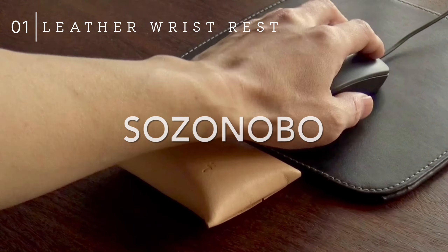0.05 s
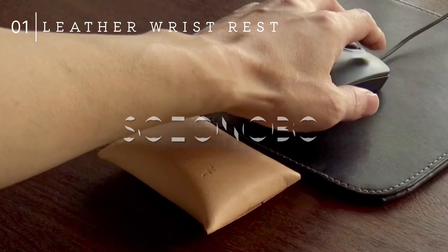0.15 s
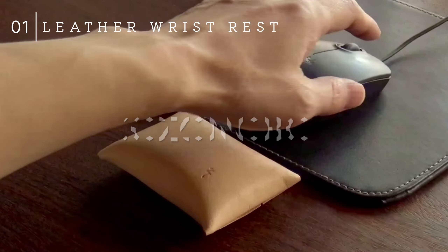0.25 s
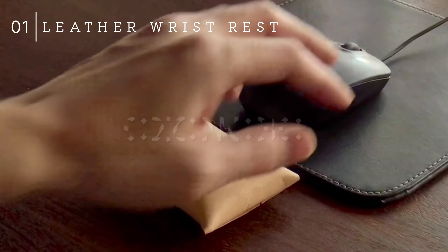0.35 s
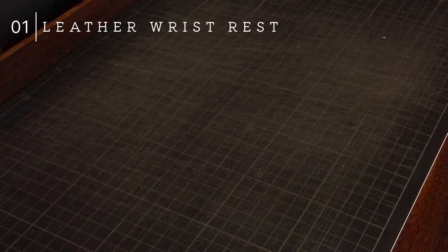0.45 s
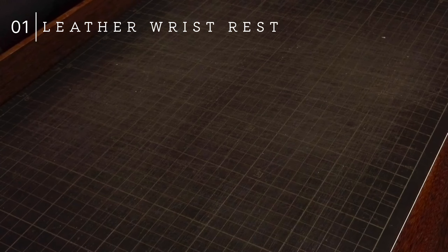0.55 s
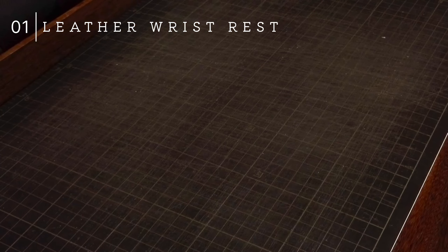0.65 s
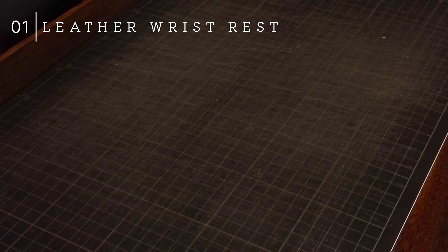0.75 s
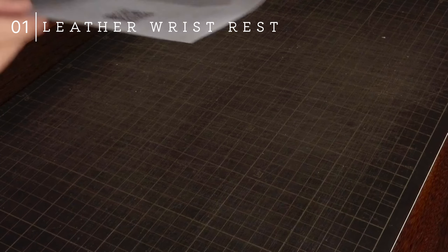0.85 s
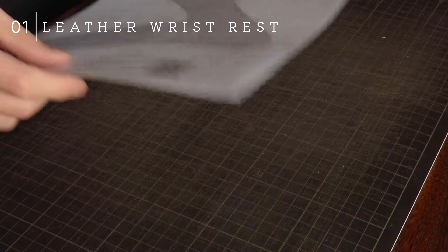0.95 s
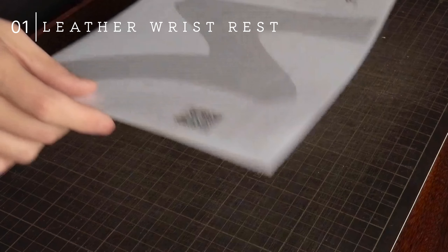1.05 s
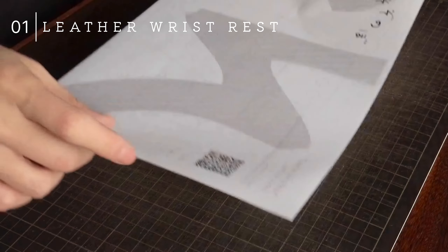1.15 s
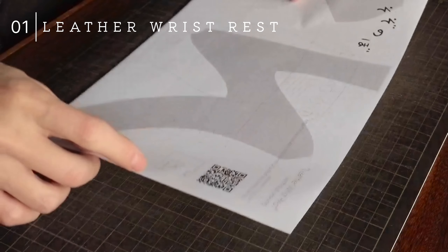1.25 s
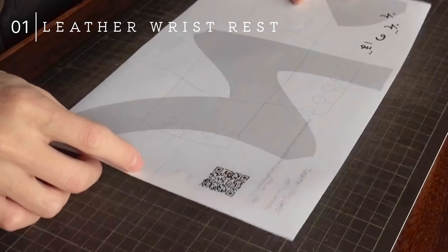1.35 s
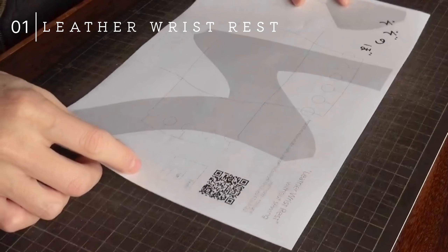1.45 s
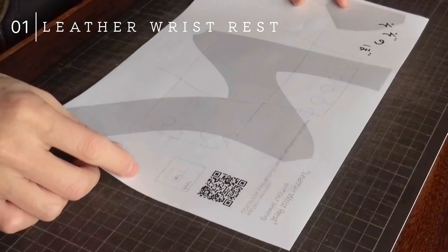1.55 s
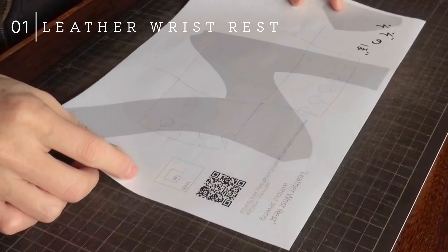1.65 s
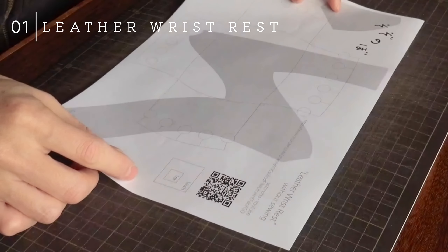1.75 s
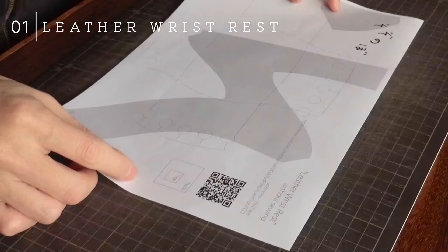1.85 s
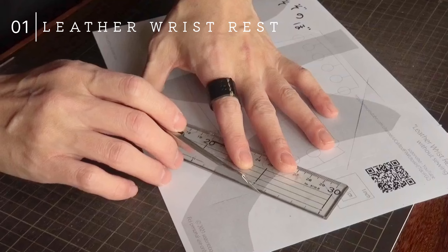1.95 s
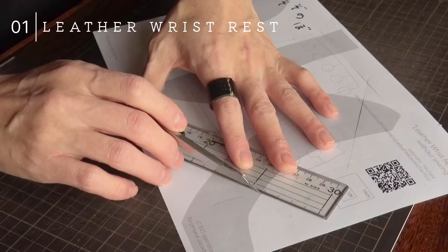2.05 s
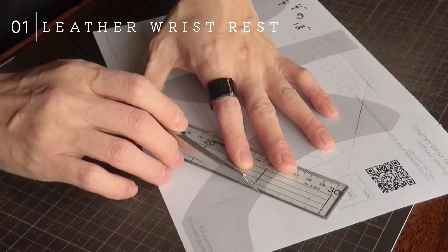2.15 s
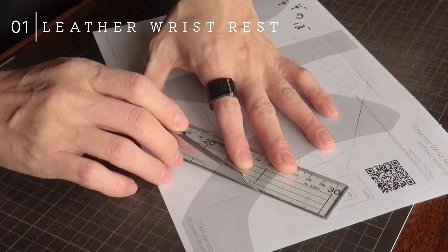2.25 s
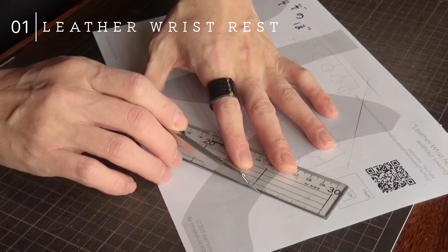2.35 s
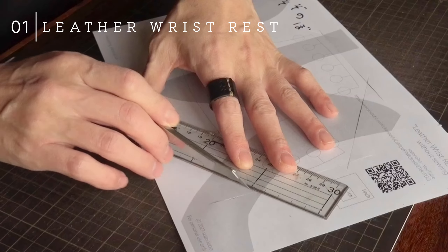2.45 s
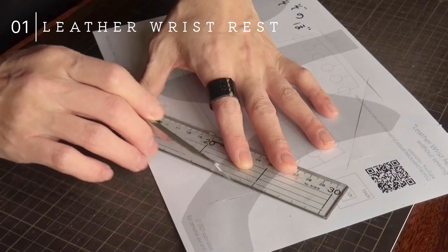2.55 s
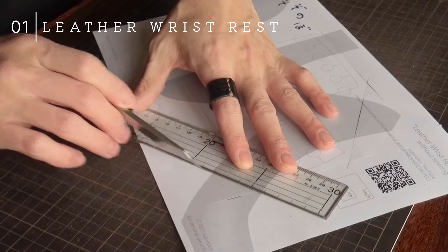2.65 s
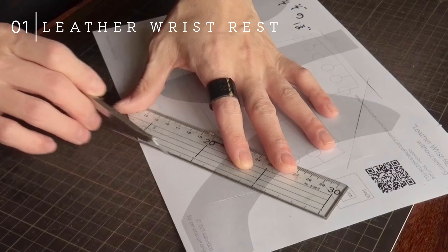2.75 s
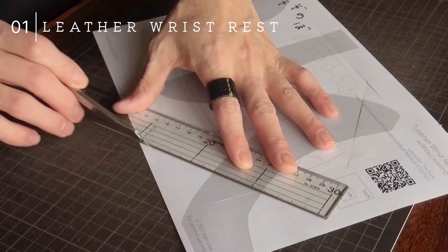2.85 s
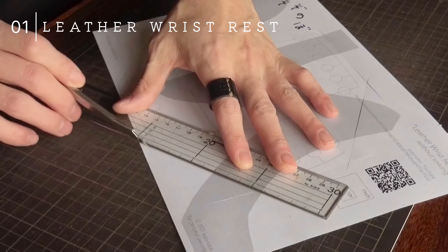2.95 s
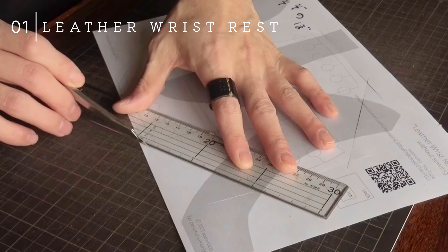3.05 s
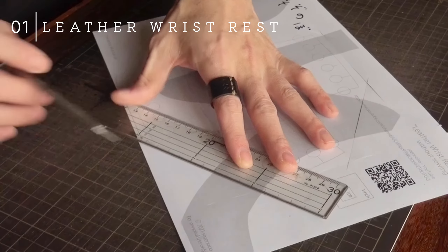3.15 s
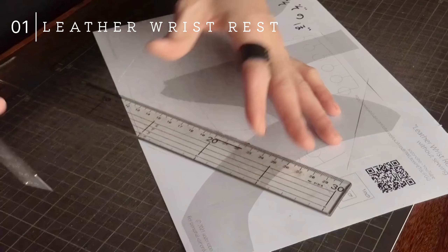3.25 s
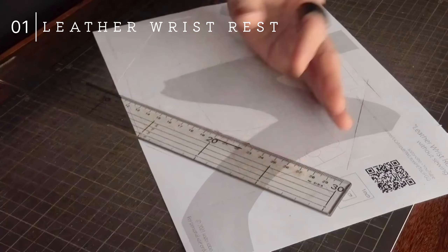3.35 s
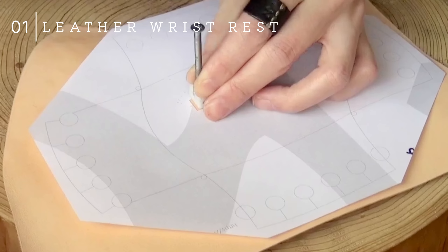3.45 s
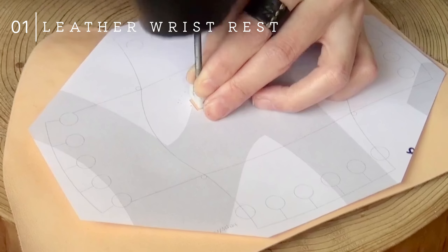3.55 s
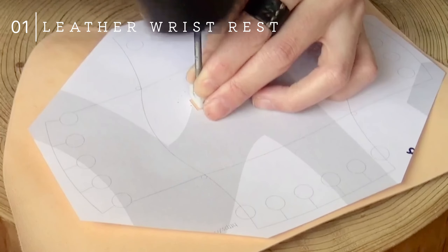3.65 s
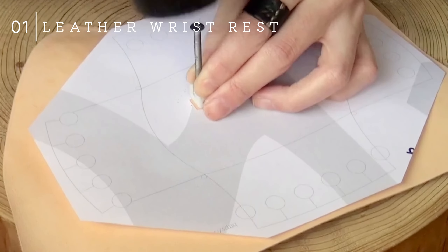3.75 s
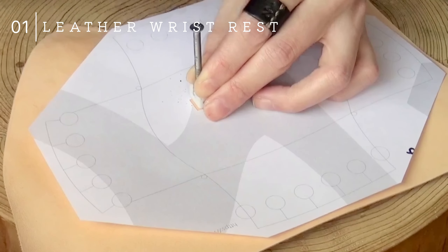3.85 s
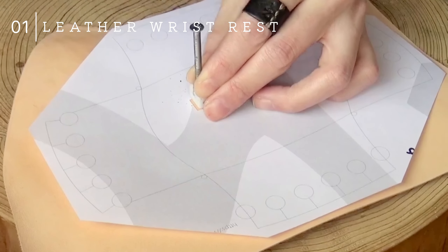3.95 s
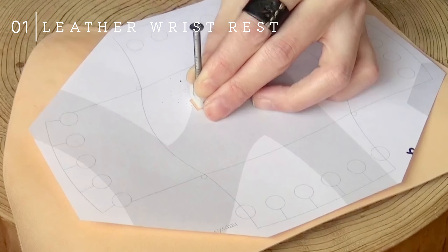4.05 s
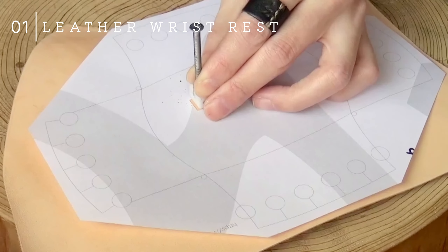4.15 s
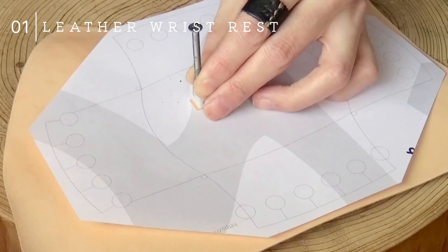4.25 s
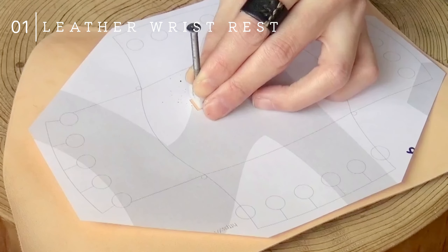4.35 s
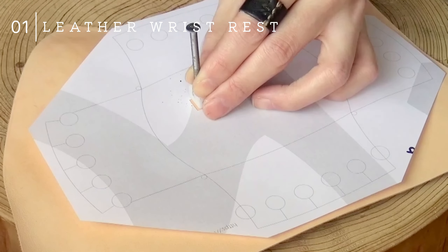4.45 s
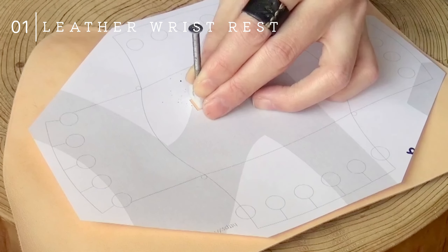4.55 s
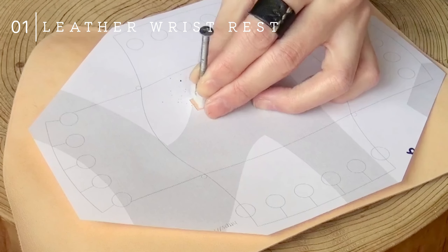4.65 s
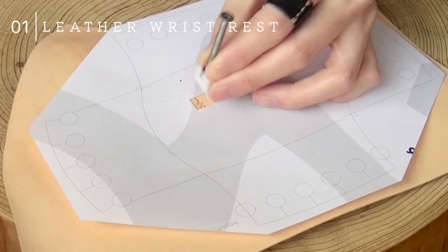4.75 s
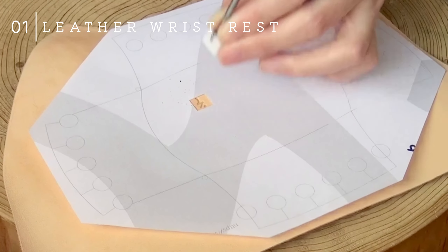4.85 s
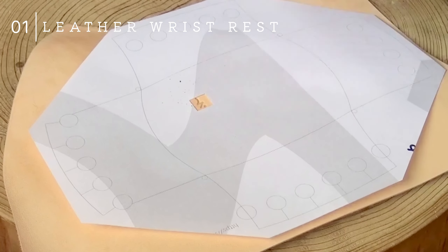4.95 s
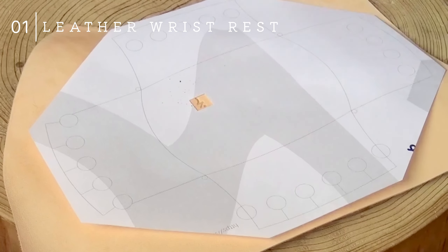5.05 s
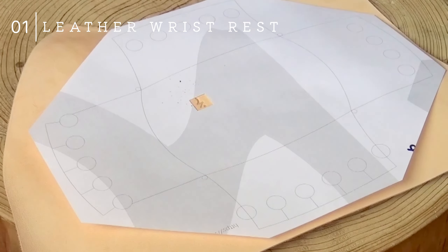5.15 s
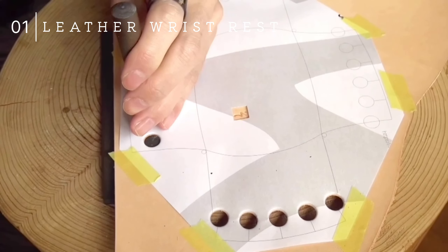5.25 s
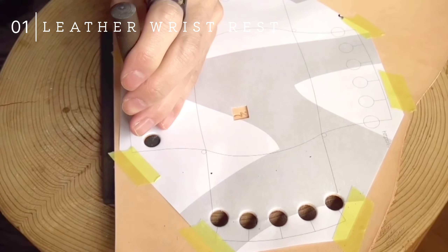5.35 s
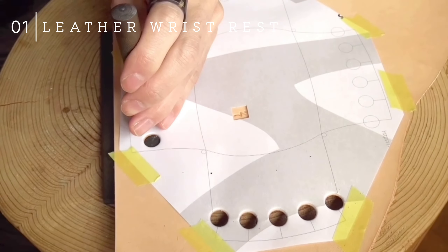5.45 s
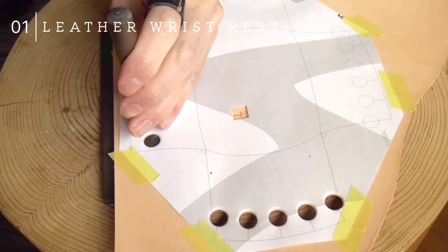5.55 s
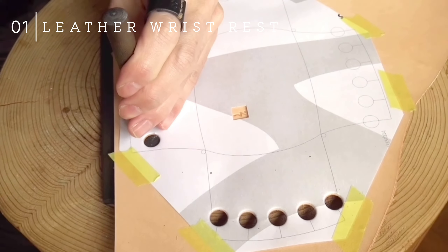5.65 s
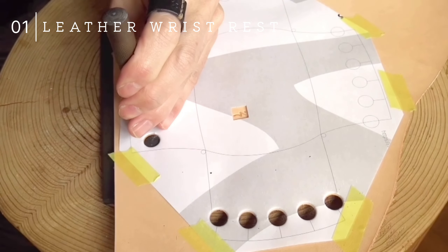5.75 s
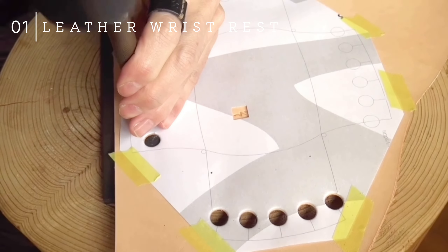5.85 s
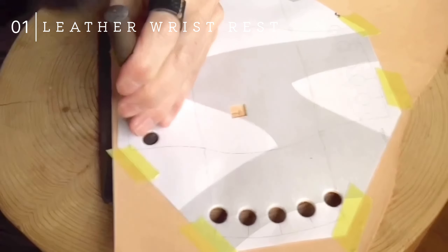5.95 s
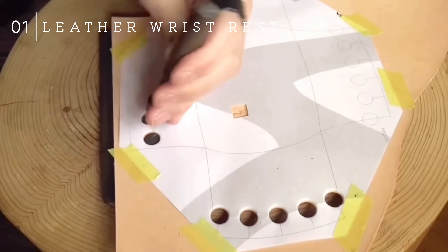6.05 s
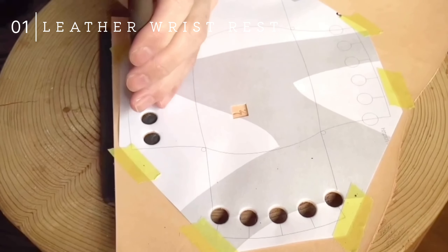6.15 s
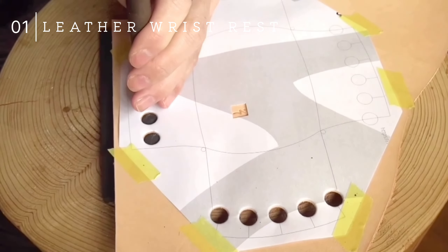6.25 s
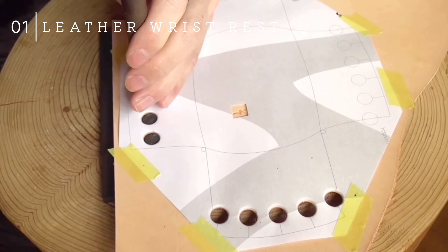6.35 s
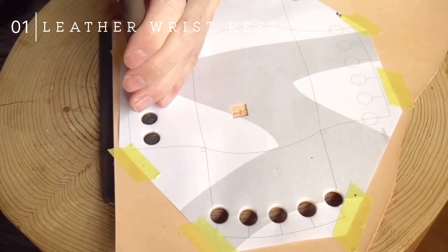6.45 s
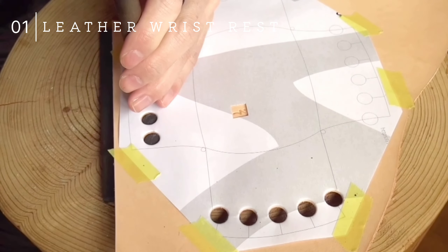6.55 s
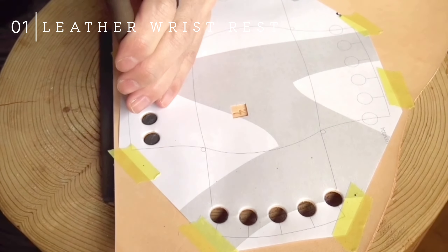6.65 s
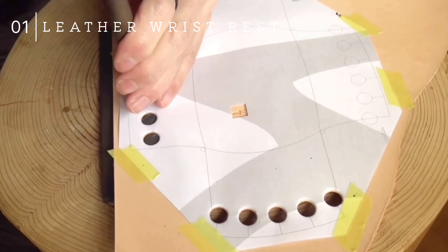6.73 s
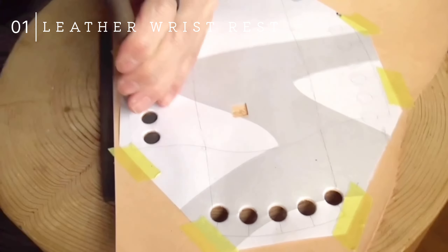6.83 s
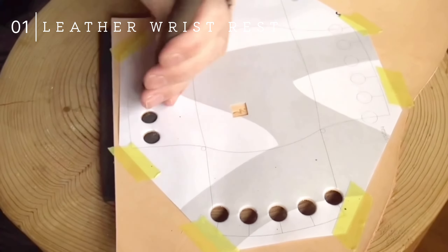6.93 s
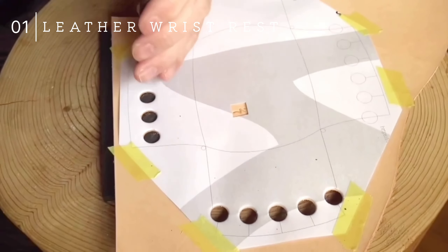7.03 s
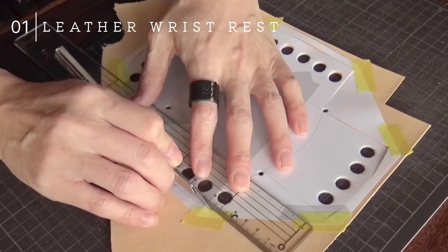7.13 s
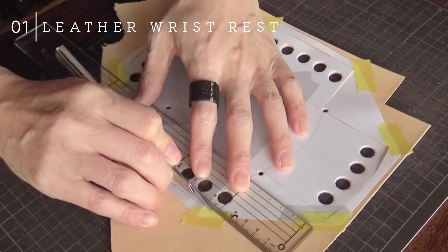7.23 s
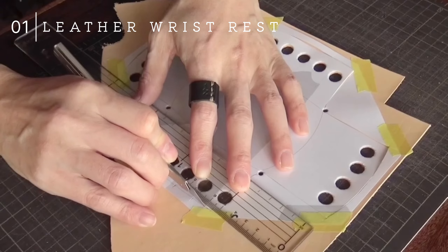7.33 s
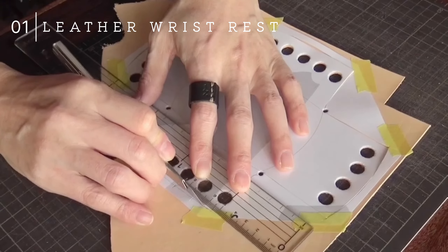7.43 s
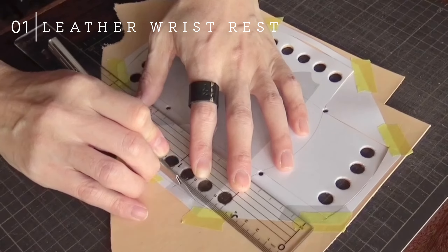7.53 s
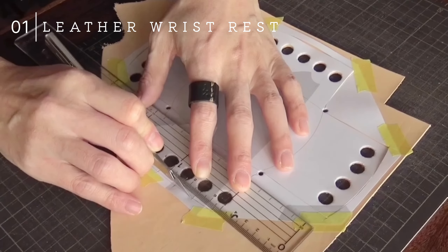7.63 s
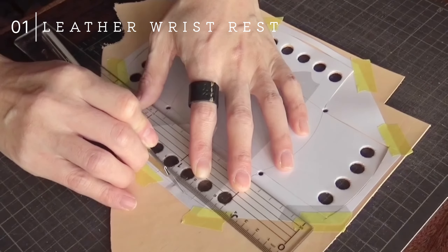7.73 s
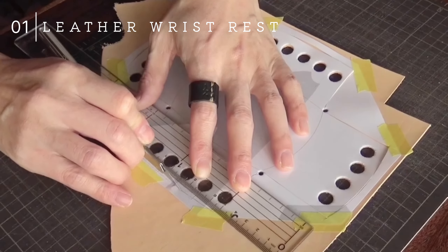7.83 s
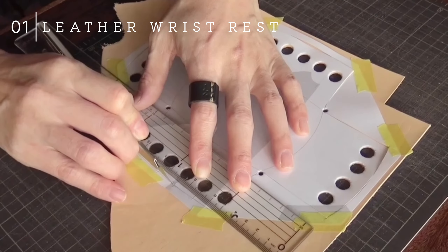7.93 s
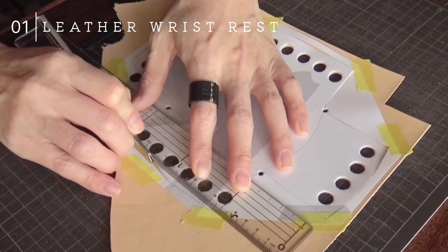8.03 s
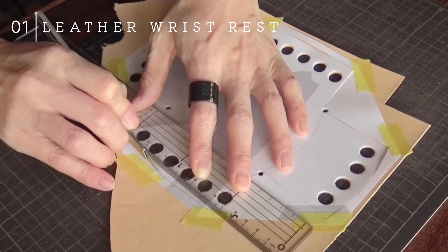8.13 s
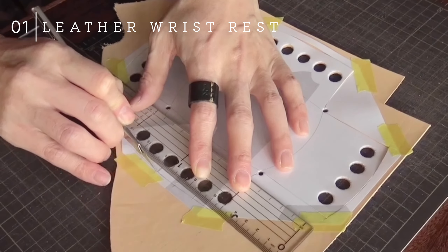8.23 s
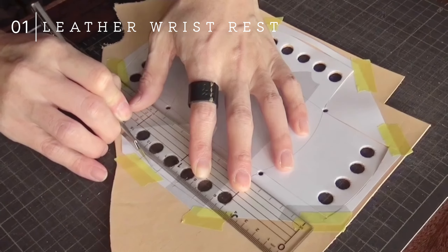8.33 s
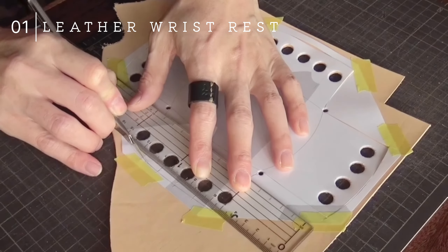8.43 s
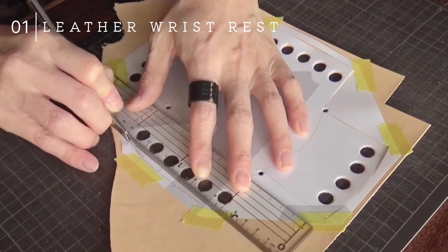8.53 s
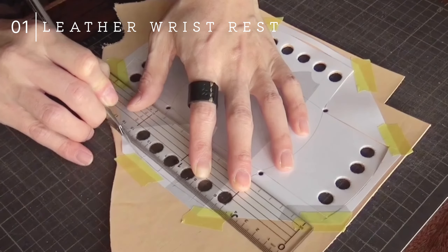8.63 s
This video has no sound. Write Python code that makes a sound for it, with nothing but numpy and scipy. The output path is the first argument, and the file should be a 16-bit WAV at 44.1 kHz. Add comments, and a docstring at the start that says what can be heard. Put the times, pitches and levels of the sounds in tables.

```python
"""Leather work on a bench

A paper pattern slides and flaps down. A knife rubs and whistles along a ruler. A thin, then a wide
hollow punch is hammered into a wooden block: steel cracks, block and bench ring, the wide edge crunches
through. The knife saws in short strokes that catch and let go. Each passage fades in and out with
quiet room tone."""
import sys
import numpy as np
from scipy import signal
from scipy.fft import rfft, irfft, next_fast_len
from scipy.io import wavfile

SR = 44100
rng = np.random.default_rng(int(sys.argv[2]) if len(sys.argv) > 2 else 0)


def store_wav(level_fs):
    """Save 16-bit WAV to argv[1]."""
    pcm = np.round(np.clip(np.atleast_2d(level_fs), -1, 1) * 32767)
    wavfile.write(sys.argv[1], SR, pcm.T.astype(np.int16))


N = 382995
FFT_SIZE = next_fast_len(N)
TIME_S = np.arange(N) / SR
FREQ_HZ = np.maximum(np.fft.rfftfreq(FFT_SIZE, 1 / SR), 1)

# Hammer contacts. Each row: start in seconds, body level in dB, crack level in dB.
THIN_HITS = [(3.489, -40.5, -14), (3.4915, -3, -7.5), (3.639, -40.5, -19), (3.6425, -3.5, -5.5)]
WIDE_HITS = [(5.8035, -7.5, -9), (5.9045, -26.5, -15), (5.9062, -3, -19), (5.9187, -8, -9.5),
             (6.7145, -5.5, -10.5), (6.8025, -21, -14), (6.8045, -3, -13), (6.818, -13, -19.5)]
# Block, bench and tube modes. Each row: frequency in Hz, relative level in dB, T60 in seconds.
THIN_BODY_MODES = [(63, -5, .3), (112.7, -13.5, 0.2), (170, -14.5, 0.17), (231.2, 4.5, 0.12),
                   (253, -2, 0.23), (328.4, -0.5, 0.17), (342, -17.5, 0.91), (384.4, -5, .2),
                   (411, -10.5, 0.23), (552.6, -1, 0.093), (598, -1, 0.11), (682, -9, 0.16), (738, -9, 0.2),
                   (788, -17, 0.12), (1635, -16, .1), (1800, -17.5, .1), (2422, -12, .09),
                   (2563, -10.5, .09), (5560, -19.5, .06)]
WIDE_BODY_MODES = [(194, -11.5, 0.093), (319.4, -16.5, 0.083), (430, -14, 0.068), (650.4, -1.5, 0.035),
                   (794, -9, 0.034), (974, 2, 0.032), (1008, 7, 0.045), (1114, -8.5, 0.05)]
TUBE_MODES = [(600, -8, 0.43), (1208, -1.5, 0.43), (1237, -1.5, 0.35), (1570, -3, .2), (1890, -13, 0.23),
              (6600, -6.5, 0.15)]
# Dense ring of the block. Each row: frequency in Hz, relative level in dB.
THIN_RING_DB = [(50, -28), (200, -11.5), (600, -14), (950, -28.5), (1300, -12.5), (2300, -9), (3300, -18.5),
                (4000, -49), (5500, -12), (7000, -34.5), (10000, -34.5), (16000, -53.5)]
WIDE_RING_DB = [(50, -48.5), (200, -26), (800, -20), (1100, -21), (1700, -23), (2500, -33), (4000, -25.5),
                (5300, -23), (7000, -33.5), (11000, -38.5), (16000, -64.5)]
# Its decay. Each row: frequency in Hz, T60 in seconds.
THIN_RING_T60_S = [(60, 0.087), (200, 0.54), (500, 0.31), (2000, 0.2), (10000, 0.13)]
WIDE_RING_T60_S = [(150, 0.08), (600, .08), (1500, 0.064), (3000, 0.054), (12000, .045)]
# Wide punch biting. Each row: start in seconds, crunch in dB, length in seconds, ring in dB, thud in dB.
WIDE_BITES = [(5.9022, -24.5, 0.018, -30, -21), (6.8006, -24.5, 0.017, -29, -22.5)]
# Two paper slides. Each row: time in seconds, body level in dB, crisp level in dB.
PAPER_SLIDES = [
    [(.42, -60, -65), (.49, -57, -62), (.54, -68, -76), (.61, -58.5, -67), (.67, -68, -71), (.70, -56, -52),
     (.83, -55.5, -58.5), (.87, -56, -43.5), (.97, -51.5, -53.5), (1.14, -53.5, -52), (1.225, -57, -62),
     (1.33, -55, -51), (1.79, -66, -64), (1.9, -60, -51.5)],
    [(3.1, -59.5, -61.5), (3.29, -70.5, -74), (3.35, -67, -63), (3.42, -67, -60.5)],
]
# Paper flaps and taps, then the thin punch rattling (rows from 3.57 s). Each row: start in seconds, # peak in
# dB, centre in Hz, width in octaves, T60 in seconds, treble in dB re peak.
FLAPS_AND_RATTLES = [(0.432, -57, 1700, 2.5, .12, -8), (.49, -44, 1880, 1.4, 0.16, -6),
                     (.684, -27.5, 1330, 1.2, 0.17, -7.5), (.74, -33, 1070, 1.35, 0.15, -22),
                     (.851, -33, 990, 1.73, 0.22, -20), (.895, -45, 1880, .8, .12, -10),
                     (1.238, -35, 383, 1.7, 0.27, -24), (1.268, -35, 1970, 1.5, 0.082, -18),
                     (3.573, -44, 1450, 0.34, 0.22, -43.5), (3.61, -39.5, 1400, 0.48, 0.19, -41.5),
                     (3.745, -47, 1380, 0.29, .2, -40), (5.05, -37, 1920, 1.7, 0.062, -5.5)]
# Bright ticks. Each row: start in seconds, peak in dB.
BRIGHT_TICKS = [(0.7415, -31), (2.394, -35), (3.113, -51), (3.1602, -46), (3.3124, -49), (4.6982, -53),
                (5.9763, -43), (6.865, -33.5)]
# Metallic rings. Each row: start in seconds, level in dB, frequency in Hz, T60 in seconds.
METAL_PINGS = [(0.424, -50.5, 4200, 0.21), (.555, -57, 4180, 0.15), (.686, -48, 3000, 0.12),
               (3.574, -40.5, 1493, 0.24), (3.58, -41.5, 1330, 0.23), (3.74, -55, 1485, .25)]
# Rub under blade pressure; faint hiss. Each row: time in seconds, level in dB.
CUT_LEVEL_DB = [(2.29, -76), (2.4, -52.5), (2.65, -39), (2.78, -41.5), (2.87, -51.5), (2.94, -70)]
HISS_LEVEL_DB = [(5.2, -63), (5.45, -62), (5.65, -69), (6.05, -81), (6.3, -64.5), (6.6, -62), (7.03, -78.5)]
# Sawing. Each row: start in seconds, level in dB, rise in seconds, length in seconds.
SAW_STROKES = [(7.247, -56, 0.011, 0.034), (7.306, -58.5, .009, 0.029), (7.383, -56, .013, 0.025),
               (7.446, -51, 0.045, 0.077), (7.556, -50, 0.0054, 0.045), (7.658, -54, 0.0027, 0.023),
               (7.692, -53.5, .0075, 0.042), (7.769, -51, .0037, 0.035), (7.835, -45, 0.056, 0.044),
               (7.921, -53, 0.024, 0.064), (8.028, -50.5, 0.0045, 0.029), (8.092, -53.5, 0.0028, 0.033),
               (8.158, -50.5, .031, 0.047), (8.255, -53, 0.0071, .037), (8.34, -55, 0.024, 0.042),
               (8.394, -56, .02, .05), (8.499, -53, 0.0073, .038), (8.574, -55, 0.016, 0.095)]
# Punch squeak. Each row: time in seconds, pitch in Hz, level in dB.
SQUEAK_PATH = [(3.96, 8400, -92), (4.0, 8600, -83), (4.035, 9750, -72), (4.09, 9350, -76),
               (4.135, 11000, -80), (4.165, 10300, -73), (4.195, 9000, -90)]
# Hums. Each row: start and length in seconds, level in dB, pitch in Hz, rise and T60 in seconds,
# waver in Hz.
HUM_SPANS = [(0.496, 1.25, -51, 59, .25, .5, 5.1), (5.2, 2.03, -66.5, 560.6, .01, .01, 2.48)]
# Rumbles. Each row: start and length in seconds, level in dB, centre in Hz, rise and T60 in seconds.
RUMBLE_SPANS = [(3.807, 0.21, -51.5, 60, .01, .3), (7.087, 0.24, -57.5, 127, 0.028, 0.74)]
# Rumble spectrum. Each row: multiple of the centre, relative density in dB.
RUMBLE_SHAPE = [(.3, -33), (.75, -8), (1.0, 9), (1.3, -8), (2.2, -30), (5, -53)]
# Noise spectra, room tones one list each. Each row: frequency in Hz, relative density in dB.
CRUNCH_SPECTRUM = [(880, -48.5), (1500, -6.5), (2800, -3.5), (3000, -20), (3810, -6), (5880, -12.5),
                   (14300, -11.5), (16000, -34)]
PAPER_SPECTRUM = [(300, -47), (600, -2), (1200, -11), (1700, 0.5), (3000, -3.5), (4500, -2.5), (6500, -11),
                  (10000, -32)]
CRISP_SPECTRUM = [(2500, -43), (4500, -3.5), (6000, -1), (8300, 2), (11000, -4), (16000, -7)]
MAT_SPECTRUM = [(59, -41), (100, -10), (252, -4), (377, -14.5), (407, -7.5), (563, -7.5), (829, -7.5),
                (1610, -10.5), (4000, -22.5), (5200, -38), (8800, -120)]
BLADE_SPECTRUM = [(1180, -27), (2000, -13), (4450, -5), (7980, -2.5), (13000, -1), (14000, -4),
                  (14500, -62), (16000, -73)]
LEATHER_SPECTRUM = [(47, -40), (80, -7), (224, -7), (359, -8.5), (743, -5), (1590, -19), (1750, -10.5),
                    (2080, -24), (3500, -19.5), (4550, -38), (7700, -120)]
EDGE_SPECTRUM = [(1470, -28), (2500, -4), (3460, -11), (3740, -10), (4730, 2.5), (5650, -6.5),
                 (12300, -9.5), (16000, -10.5)]
HISS_SPECTRUM = [(2500, -36), (3700, -7.5), (5200, -13), (6000, 5), (7200, -2), (8000, -9.5), (9300, -14),
                 (11000, -30.5)]
ROOM_SPECTRA = [
    [(12, -71), (20, -16.5), (60, -3), (242, -13.5), (278, -17), (551, -22.5), (832, -27), (1560, -19),
     (2860, -32), (8090, -37), (14000, -37)],
    [(12, -35), (20, -5.5), (65, 1.5), (184, -7), (211, -6), (536, -13.5), (706, -13), (879, -17),
     (1520, -10.5), (3190, -31), (14000, -34)],
    [(12, -30), (20, -13.5), (81, -4), (168, -10.5), (204, -15), (446, -19), (574, -26.5), (738, -22.5),
     (1150, -24.5), (1860, -18.5), (2910, -24.5), (3250, -34.5), (16000, -39)],
    [(12, -86.5), (20, -47), (134, -9), (172, -11.5), (204, -1.5), (513, -14), (558, -4.5), (780, -15),
     (1570, -19.5), (2750, -26), (6010, -25), (14300, -38), (16000, -44)],
    [(12, -51), (20, -27), (241, -2), (367, -16), (422, -5), (574, -16.5), (718, -13.5), (1530, -22.5),
     (1710, -20), (3070, -24), (4940, -18), (5850, -28.5), (16000, -37.5)],
]
# Peaks and dips on those spectra. Each row: centre in Hz, width in Hz, lift in dB.
MAT_PEAKS = [(412, 74, 2.5), (622, 66, 10), (840, 59, 7), (945, 46, 9), (1170, 38, 6)]
LEATHER_PEAKS = [(267, 72, 9), (514, 80, 4), (728, 69, 6.7), (997, 84, 9), (1315, 45, 13), (1770, 84, 6.8)]
EDGE_PEAKS = [(3830, 130, 12), (4700, 360, 2), (6840, 300, 1), (8350, 200, 6), (10400, 300, -1),
              (13500, 500, 4)]
HISS_PEAKS = [(3770, 250, 7.5), (4830, 200, 5), (5950, 200, 4.5), (6610, 250, -2.5), (7000, 200, 4)]
ROOM_PEAKS = [
    [(61.5, 9.3, 1)],
    [(1390, 470, -9)],
    [(700, 94, 4), (1530, 56, 1), (1854, 37, 9.5), (1898, 33, 10), (1980, 60, 6.5), (2300, 140, -1.5),
     (2863, 110, 9.5)],
    [(557, 32, 4), (652, 19, 7.5), (1524, 28, 11), (3700, 350, -6), (4860, 200, 4.5), (6020, 250, 8),
     (7000, 760, 2.5), (8860, 700, 10)],
    [(4510, 600, -1), (6720, 890, 9.5)],
]
# Stereo positions. Each row: frequency in Hz, left over right in dB.
THIN_PAN_DB = [(60, 1.5), (130, 5.5), (290, 2), (640, 4.0), (1410, -0.5), (3100, 1.0), (6820, 2),
               (15000, 0)]
WIDE_PAN_DB = [(60, 0.5), (130, 1), (290, 2), (640, 2), (1410, -1.5), (3100, -1.5), (6820, 0.5),
               (15000, -1)]
PAPER_PAN_DB = [(60, 2.0), (180, 2.5), (550, -1), (1650, -2), (4970, -0.5), (15000, 0.0)]
CUT_PAN_DB = [(60, 4), (180, 5), (550, -0.5), (1650, -2), (4970, -0.5), (15000, 0.5)]
SAW_PAN_DB = [(60, 0), (180, 0), (550, 4), (1650, -1.5), (4970, -1.5), (15000, 0.5)]
# Background stereo width. Each row: frequency in Hz, left-right coherence.
ROOM_COHERENCE = [(60, 0.96), (240, 0.93), (950, 0.76), (3770, 0.73), (15000, 0.54)]
# Passages. Each row: start, end, fade-in and fade-out in seconds, room tone in dB,
# left over right in dB, room index, bandwidth index.
PASSAGES = [(0.416, 1.905, 0.02, 0.0049, -54.5, 1, 0, 0), (1.945, 3.098, 0.026, 0.03, -53.5, 0.5, 1, 0),
            (3.095, 3.418, 0.022, 0.0066, -54, 0.5, 1, 2), (3.462, 3.813, 0.014, 0.048, -51, -0.1, 2, 2),
            (3.8, 5.161, 0.043, 0.0061, -52.5, 1, 2, 2), (5.201, 7.033, 0.021, 0.0031, -58.5, 0.6, 3, 1),
            (7.08, 8.8, 0.02, 0.0059, -56, 0.5, 4, 2)]
# Low-pass edges in Hz, by bandwidth index.
BANDWIDTHS_HZ = [13850, 15500, 15800]


def punch(hits, body_modes, ring_curve, ring_t60_s, modes_db, ring_db,
          crack_hz, crack_t60_s, snap_db, tail_db, rise_s, coherence):
    """Each blow: a steel-on-steel crack and snap, then block modes over a dense ring."""
    body = from_db(modes_db) * modes(body_modes, rise_s, waver_db=5)
    for hz in 50 * 2 ** np.arange(0, 8.4, 1 / 3):
        band = burst(hz, at_hz(ring_t60_s, hz), octaves=1 / 3, coherence=coherence)
        body[:, :band.shape[1]] += from_db(ring_db + at_hz(ring_curve, hz)) * np.sqrt(hz / 500) * band
    wall_tail = from_db(tail_db) * burst(600, .34, octaves=1.6, coherence=.93)
    body[:, :wall_tail.shape[1]] += wall_tail
    out = np.zeros((2, N))
    for start_s, body_db, crack_db in hits:
        crack = burst(crack_hz, crack_t60_s, octaves=.6, coherence=coherence)
        snap = burst(14000, .012, octaves=2.1, coherence=coherence)
        add(out, from_db(body_db) * body, start_s)
        add(out, from_db(crack_db) * crack, start_s)
        add(out, from_db(crack_db + snap_db) * snap, start_s)
    return out


def bites():
    """The edge crunches through paper and leather and thuds into the block; the freed tube rings."""
    out, envelope = np.zeros((2, N)), 0
    for start_s, crunch_db, length_s, ring_db, thud_db in WIDE_BITES:
        add(out, from_db(thud_db) * burst(420, .3, octaves=1.94, coherence=.92), start_s + .00293)
        add(out, from_db(ring_db) * modes(TUBE_MODES, rise_s=.0036, waver_db=3.5), start_s)
        envelope += from_db(crunch_db) * swell(start_s, .003, length_s, t60_s=.063)
    return out + envelope * noise(CRUNCH_SPECTRUM, coherence=.79, grain_db=1)


def paper():
    """The sheet slides on the mat with a grainy hiss; each flap opens with a dry click. The same bursts give
    the thin punch's rattle."""
    body = noise(PAPER_SPECTRUM, coherence=.97, grain_db=1.5, patchy_db=2.5)
    crisp = noise(CRISP_SPECTRUM, coherence=.84, grain_db=2, patchy_db=1.8)
    out = sum(level(slide, column=1) * body + level(slide, column=2) * crisp for slide in PAPER_SLIDES)
    for start_s, db, hz, octaves, t60_s, treble_db in FLAPS_AND_RATTLES:
        flap = burst(hz, t60_s, octaves, coherence=.94)
        click = burst(1.3 * hz, .014, octaves=2.2, coherence=.94)
        treble = burst(5500, .7 * t60_s, octaves=2.8, coherence=.9)
        add(out, from_db(db) * flap, start_s)
        add(out, from_db(db - 1.5) * click, start_s)
        add(out, from_db(db + treble_db) * treble, start_s)
    return out


def ticks_and_pings():
    """Bright noise ticks and faint metallic rings."""
    out = np.zeros((2, N))
    for start_s, db in BRIGHT_TICKS:
        add(out, from_db(db) * burst(10900, .033, octaves=1.6, coherence=.94), start_s)
    for start_s, db, hz, t60_s in METAL_PINGS:
        add(out, modes([(hz, db, t60_s)], rise_s=.003, waver_db=2.2), start_s)
    return out


def knife_cut():
    """One pull along the ruler: mat rub, two falling whistle bands, hiss that lessens with depth."""
    peak_s, peak_hz, sag_hz_per_s = 2.65, 8020, 17000
    rise_db_per_s, fall_db_per_s, dulling_db_per_s = 98, 240, 15.5
    from_peak_s = TIME_S - peak_s
    phase = phase_of(peak_hz - sag_hz_per_s * np.clip(from_peak_s, -.3, .3))
    whistle = sum(drift(550) * np.cos(k * phase) + drift(550) * np.sin(k * phase) for k in (1, 1.5))
    whistle_db = -43 + np.minimum(rise_db_per_s * from_peak_s, -fall_db_per_s * from_peak_s)
    rub = noise(MAT_SPECTRUM, MAT_PEAKS, coherence=.94, grain_db=1)
    blade = noise(BLADE_SPECTRUM, coherence=.87, grain_db=1.5, patchy_db=1.8)
    blade *= from_db(3 - dulling_db_per_s * (TIME_S - CUT_LEVEL_DB[0][0]))
    return level(CUT_LEVEL_DB, column=1) * (rub + blade) + from_db(whistle_db) * whistle


def sawing():
    """Each stroke catches in the leather and lets go; the edge hiss swells slightly later."""
    release_t60_s, knock_loss_db_per_s = .062, 632
    rub_gain, edge_gain, knocks = 0, 0, np.zeros((2, N))
    for start_s, db, rise_s, length_s in SAW_STROKES:
        knock_db = db + 9 - knock_loss_db_per_s * rise_s   # sudden starts knock harder
        add(knocks, from_db(knock_db) * burst(580, .045, octaves=1.1, coherence=.99), start_s)
        rub_gain += from_db(db) * swell(start_s, rise_s, length_s, release_t60_s)
        edge_gain += from_db(db - 5) * swell(start_s, rise_s + .0054, length_s, release_t60_s)
    rub = noise(LEATHER_SPECTRUM, LEATHER_PEAKS, coherence=.95, grain_db=1.5)
    edge = noise(EDGE_SPECTRUM, EDGE_PEAKS, coherence=.97, patchy_db=2)
    return knocks + rub_gain * rub + edge_gain * edge


def squeak():
    """The thin punch squeaks faintly as it is worked loose."""
    times_s, pitches_hz, _ = np.transpose(SQUEAK_PATH)
    gain = level(SQUEAK_PATH, column=2) * from_db(4.4 * drift(50))
    pitch_hz = np.interp(TIME_S, times_s, pitches_hz) + 150 * drift(200)
    return gain * np.sin(phase_of(pitch_hz))


def hums():
    """Held tones, wavering slightly in level and pitch."""
    out = 0
    for start_s, length_s, db, hz, rise_s, t60_s, waver_hz in HUM_SPANS:
        gain = swell(start_s, rise_s, length_s, t60_s) * from_db(db + 1.5 * drift(4))
        out += gain * np.sin(phase_of(hz + waver_hz * drift(6)))
    return out


def rumble():
    """Brief swells of low noise."""
    out = 0
    for start_s, length_s, db, centre_hz, rise_s, t60_s in RUMBLE_SPANS:
        spectrum = [(centre_hz * ratio, density_db) for ratio, density_db in RUMBLE_SHAPE]
        out += from_db(db) * swell(start_s, rise_s, length_s, t60_s) * noise(spectrum, coherence=.94)
    return out


def hiss():
    """Faint hiss that swells and dips."""
    return level(HISS_LEVEL_DB, column=1) * noise(HISS_SPECTRUM, HISS_PEAKS, patchy_db=2.6)


def room_tones():
    """One noise bed per room index, coloured by its spectrum with narrow and broad peaks and dips."""
    return [noise(spectrum, peaks, patchy_db=1.36) for spectrum, peaks in zip(ROOM_SPECTRA, ROOM_PEAKS)]


def noise(spectrum, peaks=(), coherence=None, grain_db=0, patchy_db=0):
    """Coloured stereo noise, RMS 1; grain is uneven friction, patches are swells per band."""
    db = at_hz(spectrum, FREQ_HZ)
    db += sum(lift_db / (1 + (2 * (FREQ_HZ - hz) / width_hz) ** 2) for hz, width_hz, lift_db in peaks)
    if coherence is None:
        coherence = at_hz(ROOM_COHERENCE, FREQ_HZ)
    grains = rng.standard_normal((2, N)) * from_db(grain_db * drift(250))
    bins = from_db(db) * stereo(*rfft(grains, FFT_SIZE), coherence)
    if not patchy_db:
        return unit_rms(irfft(bins, FFT_SIZE)[:, :N])
    edges_hz = [0, 400, 1300, 3300, 5200, 7800, 10500, SR]
    out = 0
    for low_hz, high_hz in zip(edges_hz, edges_hz[1:]):
        band = irfft(bins * ((FREQ_HZ >= low_hz) & (FREQ_HZ < high_hz)), FFT_SIZE)[:, :N]
        out += from_db(patchy_db * drift(7.7)) * band
    return unit_rms(out)


def burst(centre_hz, t60_s, octaves, coherence):
    """Decaying band of stereo noise, peak 1."""
    t = np.arange(int(min(t60_s, .6) * SR) + 64) / SR
    edges_hz = np.clip(centre_hz * 2 ** (octaves / 2 * np.array([-1, 1])), 20, .45 * SR)
    mid, side = rng.standard_normal((2, len(t))) * from_db(-60 * t / t60_s)
    bandpass = signal.butter(2, edges_hz, "band", fs=SR, output="sos")
    out = signal.sosfilt(bandpass, stereo(mid, side, coherence))
    return out / np.abs(out).max()


def modes(table, rise_s, waver_db):
    """Decaying sines that waver more as room echoes mix in."""
    t = np.arange(int(.6 * SR)) / SR
    knots_s = np.linspace(0, .6, 40)
    depth = waver_db * np.minimum(t / .06, 1)
    out = 0
    for hz, db, t60_s in table:
        swing_db, swing_phase = (depth * np.interp(t, knots_s, k) for k in rng.standard_normal((2, 40)))
        out += from_db(db - 60 * t / t60_s + swing_db) * np.sin(2 * np.pi * hz * t + swing_phase / 4)
    return np.tile(out * (1 - np.exp(-t / rise_s)), (2, 1))


def drift(rate_hz):
    """Random wobble, RMS 1."""
    pole = np.exp(-2 * np.pi * rate_hz / SR)
    return unit_rms(signal.lfilter([1], [1, -2 * pole, pole * pole], rng.standard_normal(N)))


def swell(start_s, rise_s, length_s, t60_s):
    """Rise, hold, decay envelope."""
    release_s = np.maximum(TIME_S - start_s - length_s, 0)
    return np.clip((TIME_S - start_s) / rise_s, 0, 1) * from_db(-60 * release_s / t60_s)


def level(rows, column):
    """Gain from a dB column over time, silent outside it."""
    rows = np.array(rows)
    return from_db(np.interp(TIME_S, rows[:, 0], rows[:, column], left=-200, right=-200))


def at_hz(curve, hz):
    """Interpolate over log frequency."""
    knots_hz, values = np.transpose(curve)
    return np.interp(np.log(hz), np.log(knots_hz), values)


def stereo(mid, side, coherence):
    """Mid and side to left and right."""
    return np.sqrt(1 + coherence) * mid + np.sqrt(1 - coherence) * side * [[1], [-1]]


def pan(pair, curve):
    """Left-right balance by frequency."""
    gains = from_db(at_hz(curve, FREQ_HZ) / 2 * [[1], [-1]])
    return irfft(rfft(pair, FFT_SIZE) * gains, FFT_SIZE)[:, :N]


def add(out, sound, start_s):
    i = round(start_s * SR)
    out[:, i:i + sound.shape[1]] += sound[:, :N - i]


def phase_of(hz):
    return 2 * np.pi * np.cumsum(hz) / SR


def from_db(db):
    return 10 ** (np.asarray(db) / 20)


def unit_rms(x):
    return x / np.sqrt(np.mean(x ** 2) + 1e-20)


def scene():
    """Bench work over room tone; fades, bandwidth and balance per passage."""
    thin = punch(THIN_HITS, THIN_BODY_MODES, THIN_RING_DB, THIN_RING_T60_S, modes_db=-12.5, ring_db=-11.5,
                 crack_hz=2050, crack_t60_s=.013, snap_db=-35.5, tail_db=-25, rise_s=.0036, coherence=.95)
    wide = punch(WIDE_HITS, WIDE_BODY_MODES, WIDE_RING_DB, WIDE_RING_T60_S, modes_db=-6, ring_db=-2.5,
                 crack_hz=4220, crack_t60_s=.007, snap_db=-15.5, tail_db=-30, rise_s=.0058, coherence=.84)
    bench = pan(thin, THIN_PAN_DB) + pan(wide + bites(), WIDE_PAN_DB)
    bench += squeak() + hums() + rumble()
    bench += pan(paper() + ticks_and_pings(), PAPER_PAN_DB)
    bench += pan(knife_cut(), CUT_PAN_DB) + pan(sawing(), SAW_PAN_DB) + hiss()
    rooms = room_tones()
    out = np.zeros((2, N))
    for start_s, end_s, fade_in_s, fade_out_s, room_db, balance_db, room, bandwidth in PASSAGES:
        span = slice(round(start_s * SR), round(end_s * SR))
        mix = bench[:, span] + from_db(room_db) * rooms[round(room)][:, span]
        lowpass = signal.ellip(12, .3, 60, BANDWIDTHS_HZ[round(bandwidth)], fs=SR, output="sos")
        fade_in = np.clip((TIME_S[span] - start_s) / fade_in_s, 0, 1)
        fade_out = np.clip((end_s - TIME_S[span]) / fade_out_s, 0, 1)
        balance = from_db([[balance_db / 2], [-balance_db / 2]])
        out[:, span] = signal.sosfilt(lowpass, mix) * (fade_in * fade_out) ** 1.2 * balance
    return out


def record(dry):
    """Steep low-pass, stopband from 16.4 kHz."""
    return signal.sosfilt(signal.cheby2(18, 70, 16400, fs=SR, output="sos"), dry)


dry = scene()
out = record(dry)
store_wav(out)
```